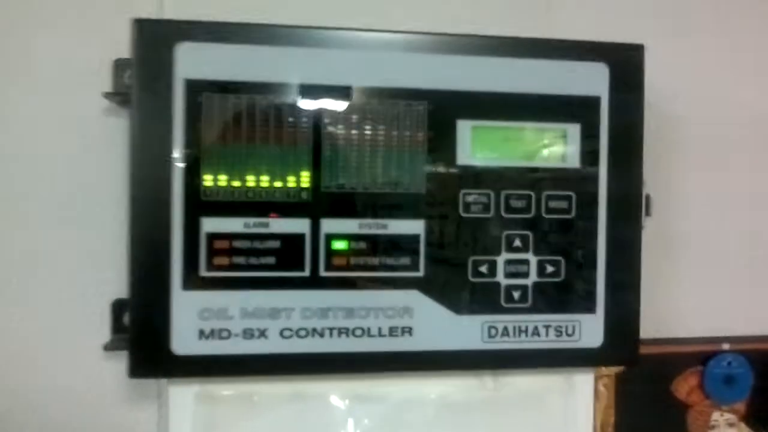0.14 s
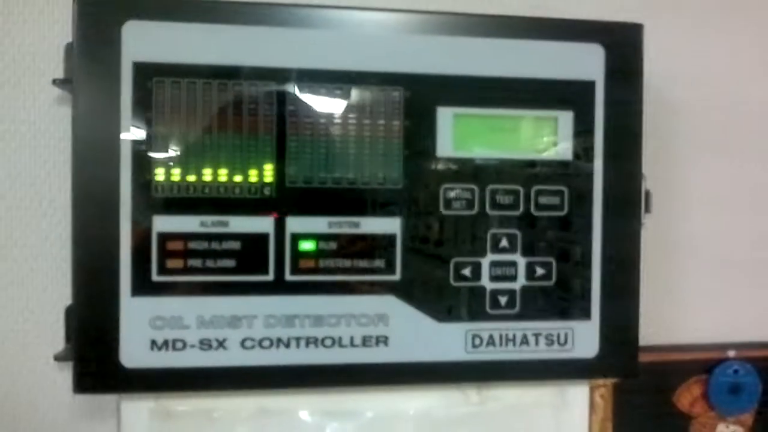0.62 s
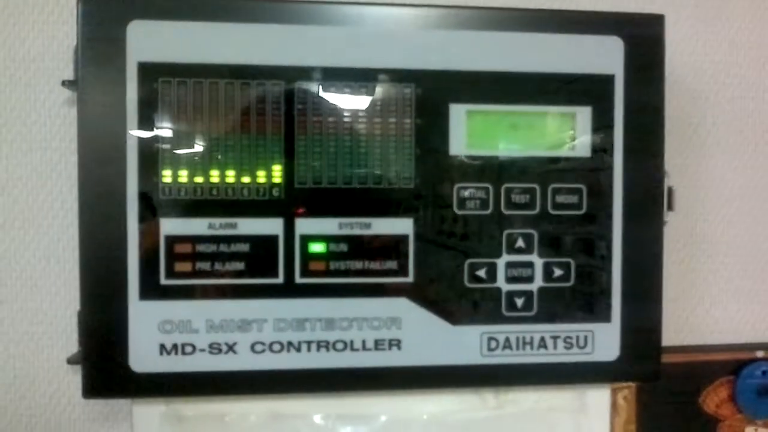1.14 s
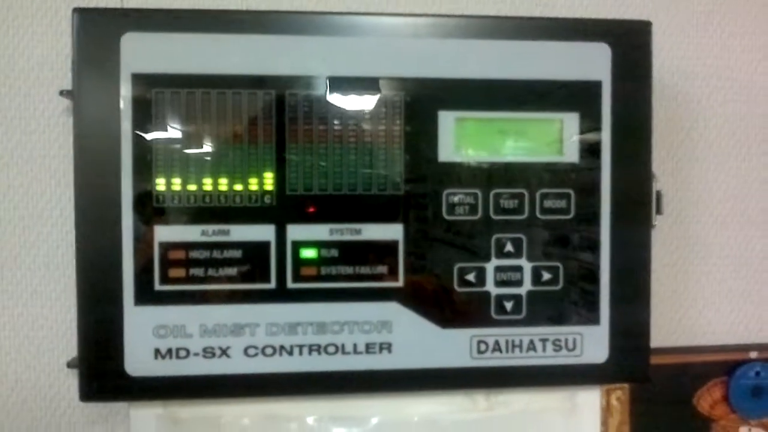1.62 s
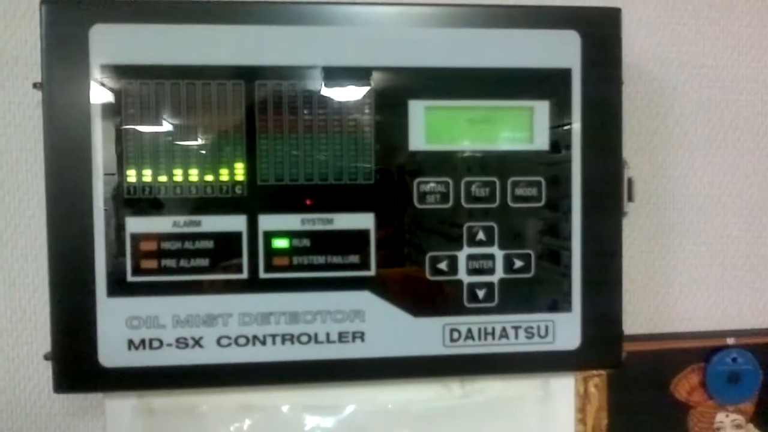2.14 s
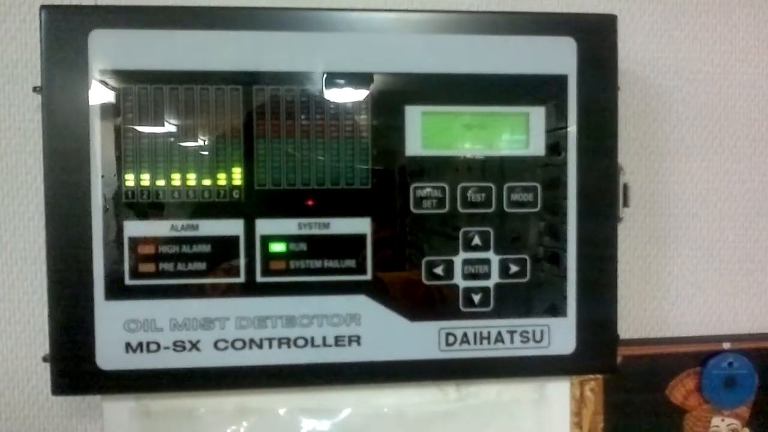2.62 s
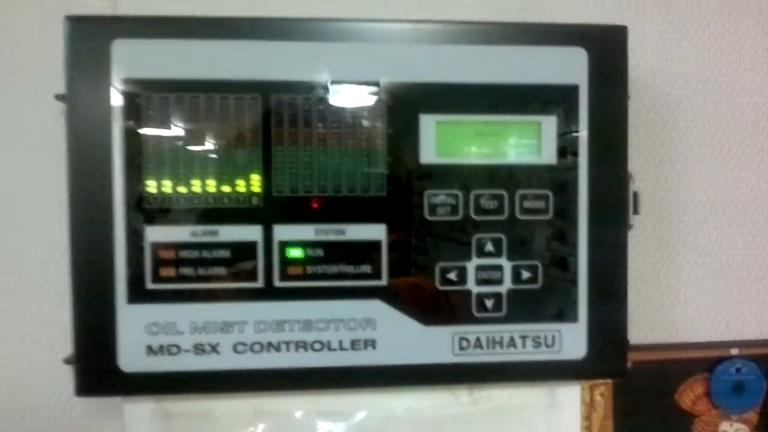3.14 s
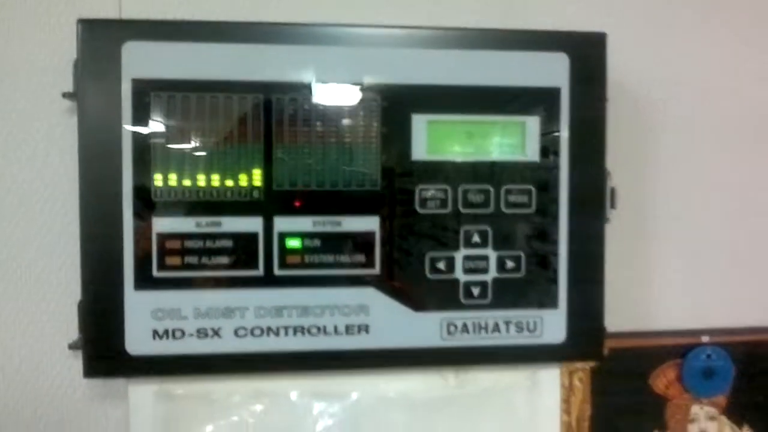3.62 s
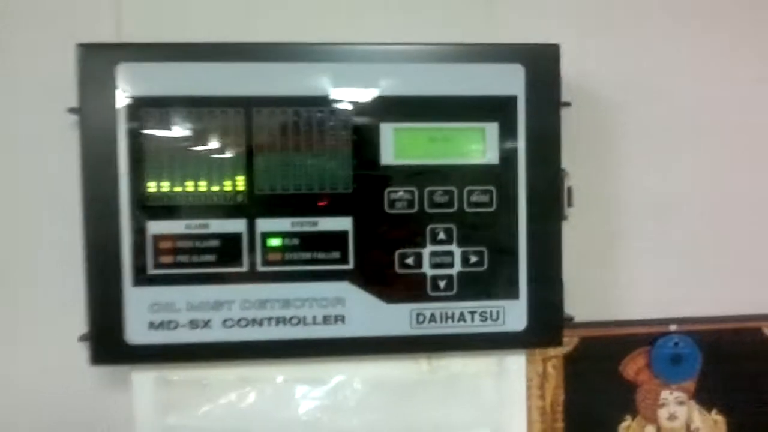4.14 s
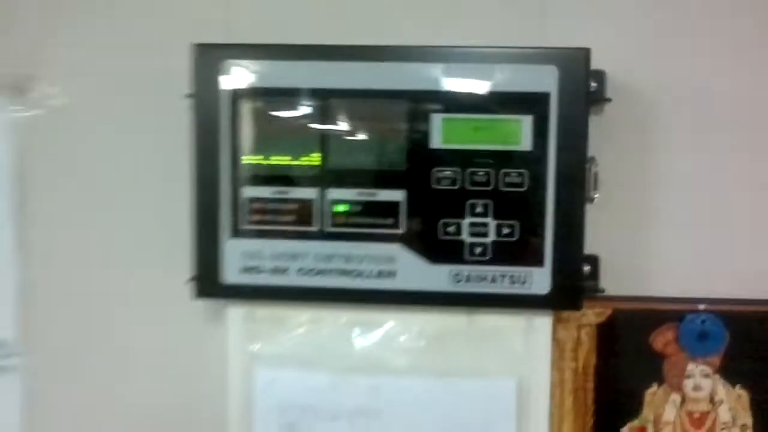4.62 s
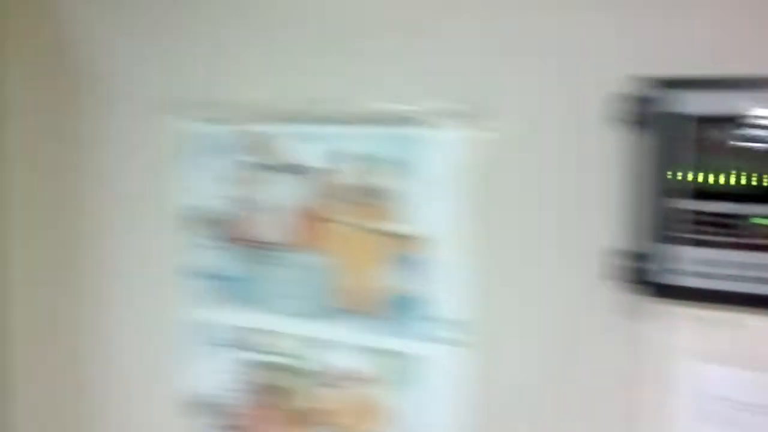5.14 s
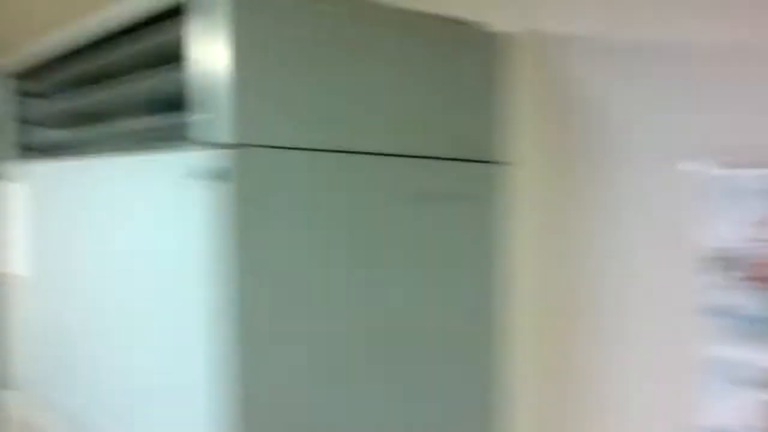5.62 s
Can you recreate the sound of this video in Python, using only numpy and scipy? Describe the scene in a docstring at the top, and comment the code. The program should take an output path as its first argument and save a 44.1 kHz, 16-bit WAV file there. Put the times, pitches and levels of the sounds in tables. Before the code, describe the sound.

Continuous low engine drone and rushing air fill an indoor control room, a wavering high-pitched whine on top and one tiny tick early on.

```python
"""A control room beside a running ship's engine. From the start the hull rumbles in the room's low modes,
ventilation air hisses as shaped noise, two turbochargers whine at nearly the same speed as stacked blade
tones, and a motor, panels and ducts hum faintly. At about 1.7 s something small ticks once, as ringing modes.
Later the slower whine sinks a little and partly recovers, and the microphone turns more towards the air."""
import sys
import numpy as np
from scipy import signal
from scipy.fft import rfft, irfft
from scipy.io import wavfile
from scipy.ndimage import uniform_filter1d

SR = 44100
rng = np.random.default_rng(int(sys.argv[2]) if len(sys.argv) > 2 else 0)


def bounce(signal):
    """Save signal as a 16-bit WAV file at the path given by the first command-line argument."""
    frames = np.transpose(np.atleast_2d(signal))
    limited = np.clip(frames, -1, 1)
    pcm = np.round(limited * 32767).astype(np.int16)
    wavfile.write(sys.argv[1], SR, pcm)


def to_linear_factor(level_db):
    """Convert decibel levels (scalar or array-like) to linear amplitude factors."""
    exponent = np.asarray(level_db, float) / 20
    return 10 ** exponent


N = 254016  # samples, 5.76 s
FLARE_EDGE_S = 0.018  # softness of the edges of whine flares and hum whiffs


def rms_one(x):
    """Scale to rms 1."""
    return x / np.sqrt(np.mean(x ** 2) + 1e-20)


def in_time(rows):
    """Turn rows of (seconds, value) into one value a sample."""
    seconds, values = np.transpose(rows)
    return np.interp(np.arange(N) / SR, seconds, values)


def drift(rate_hz):
    """Slow chance wandering with spread 1: coarse noise through two equal one-pole low-passes."""
    coarse = 40  # samples between the coarse values
    r = np.exp(-2 * np.pi * rate_hz * coarse / SR)
    noise = rng.standard_normal(N // coarse + 2002)
    slow = signal.lfilter([1], [1, -2 * r, r * r], noise)[2000:]
    return np.interp(np.arange(N) / coarse, np.arange(len(slow)), rms_one(slow))


def band_noise(low_hz, high_hz, order=2):
    """Noise in one band, its filter run in before the start; rms 1."""
    sos = signal.butter(order, [low_hz, high_hz], "band", fs=SR, output="sos")
    return rms_one(signal.sosfilt(sos, rng.standard_normal(N + SR))[SR:])


def resonant_noise(modes, order):
    """Noise through resonances; the narrow ones sound like unsteady tones."""
    total = np.zeros(N)
    for hz, width_hz, db in modes:
        total += to_linear_factor(db) * band_noise(hz - width_hz / 2, hz + width_hz / 2, order)
    return total


def swelling(rest_db, swells, edge_s):
    """Level in dB: soft-edged swells add their power to a steady rest."""
    t = np.arange(N) / SR
    power = to_linear_factor(rest_db) ** 2
    for start, length, db in swells:
        from_middle = np.abs(t - start - length / 2)
        beyond = np.maximum(from_middle - length / 2 + edge_s, 0) / edge_s
        power = power + to_linear_factor(db) ** 2 * np.exp(-beyond ** 2 / 2)
    return 10 * np.log10(power)


def coloured(points, flicker_db):
    """Noise with the given spectrum, each octave flickering partly on its own; rms 1."""
    hz = np.maximum(np.fft.rfftfreq(N, 1 / SR), 1)
    point_hz, point_db = np.transpose(points)
    shape_db = np.interp(np.log(hz), np.log(point_hz), point_db)
    spectrum = rfft(rng.standard_normal(N)) * to_linear_factor(shape_db)
    octave = np.round(np.log2(hz / point_hz[0])).clip(0, 5)
    together = drift(0.98)
    total = np.zeros(N)
    for k in range(6):
        flicker = 0.5 * together + drift(7)
        total += irfft(spectrum * (octave == k), N) * to_linear_factor(flicker_db * flicker)
    return rms_one(total)


def rumble():
    """Hull vibration feeds the room modes; throbs swell for a few cycles; lulls spare only the lowest noise."""
    # Low room modes. Each row: pitch in Hz, width in Hz, level in dB before the evening out.
    room_modes = [(29.9, 12, -31), (42.7, 8.1, -30.5), (57.8, 17.8, -27.5), (81.9, 16.2, -30.5),
                  (98.3, 9.5, -36), (114, 14, -36.5)]
    # Chance throbs. Each row: start in seconds, length in seconds, peak-swell level in dB, pitch in Hz.
    throbs = [(0.132, 0.1, -18, 42.0), (0.353, 0.13, -20, 56.0), (0.543, 0.038, -17, 50.0),
              (0.797, 0.037, -18.5, 40.0), (0.86, 0.058, -24, 52.0), (0.863, 0.046, -27, 82.0),
              (1.038, 0.11, -26, 116.0), (1.043, 0.035, -18.5, 34.0), (1.164, 0.046, -19, 54.0),
              (1.312, 0.042, -18, 38.0), (1.411, 0.066, -15.5, 44.0), (1.5, 0.071, -19, 50.0),
              (1.503, 0.068, -23, 84.0), (1.628, 0.05, -20.5, 52.0), (1.867, 0.025, -15.5, 54.0),
              (1.871, 0.022, -22.5, 100.0), (1.94, 0.063, -19, 40.0), (2.045, 0.053, -20, 50.0),
              (2.09, 0.041, -28, 70.0), (2.142, 0.058, -28.5, 92.0), (2.217, 0.017, -9, 56.0),
              (2.273, 0.024, -23, 104.0), (2.355, 0.036, -25, 116.0), (2.43, 0.065, -19.5, 56.0),
              (2.675, 0.045, -14, 42.0), (2.698, 0.057, -29, 76.0), (2.76, 0.038, -21.5, 96.0),
              (2.834, 0.03, -18, 44.0), (2.945, 0.048, -18, 46.0), (3.02, 0.11, -25.5, 114.0),
              (3.163, 0.059, -21.5, 40.0), (3.29, 0.065, -21, 38.0), (3.51, 0.031, -18, 50.0),
              (3.513, 0.13, -32, 110.0), (3.574, 0.053, -21.5, 86.0), (3.724, 0.046, -18.5, 60.0),
              (3.802, 0.043, -18.5, 42.0), (3.917, 0.037, -26, 42.0), (4.01, 0.057, -20, 84.0),
              (4.126, 0.078, -30, 42.0), (4.176, 0.051, -28.5, 84.0), (4.296, 0.095, -18, 60.0),
              (4.546, 0.06, -23, 42.0), (4.685, 0.18, -20.5, 42.0), (4.766, 0.039, -15.5, 52.0),
              (4.81, 0.063, -31, 116.0), (4.86, 0.051, -18.5, 54.0), (5.166, 0.055, -14.5, 44.0),
              (5.35, 0.19, -21, 40.0), (5.36, 0.072, -20.5, 60.0), (5.53, 0.12, -27, 50.0)]
    # Brief drops. Each row: start in seconds, length in seconds, rough depth in dB.
    lulls = [(0.772, 0.031, 9), (1.098, 0.02, 5), (1.2, 0.034, 7), (1.557, 0.033, 3), (1.83, 0.031, 4),
             (2.481, 0.065, 7), (2.983, 0.022, 7), (3.125, .03, 2), (3.345, 0.02, 10), (3.432, 0.042, 9),
             (4.06, 0.045, 8), (4.935, 0.048, 14), (5.302, 0.045, 8), (5.444, 0.022, 12), (5.592, 0.06, 10)]
    evening = 0.46  # share of the modes' own beating that is evened out
    throb_spread = 0.44  # width of the bell-shaped swell, as a share of the throb's length

    t = np.arange(N) / SR
    modes = resonant_noise(room_modes, order=2)
    beat = np.sqrt(uniform_filter1d(rms_one(modes) ** 2, int(0.06 * SR)) + 0.029)
    body = modes / beat ** evening
    for start, length, db, hz in throbs:
        swell = np.exp(-0.5 * ((t - start - length / 2) / (throb_spread * length)) ** 2)
        body += to_linear_factor(db) * np.sqrt(2) * swell * np.sin(2 * np.pi * (hz * t + rng.random()))
    lull_gain = to_linear_factor(-swelling(0, lulls, edge_s=0.0029))
    subsonic = to_linear_factor(-31.5) * band_noise(10.5, 36.0)
    return body * lull_gain + subsonic


def ventilation():
    """Four layers of air noise follow the turn of the microphone, each by its own share."""
    # Spectra of duct drone, duct roar, grille hiss and finest hiss.
    # Each row: frequency in Hz, relative level per Hz in dB.
    drone_colour = [(75, -37), (128, -0.5), (140, 0), (172, -6.5), (212, -7.5), (229, -11), (250, -9),
                    (285, -12), (366, -11.5), (430, -17.5), (560, -53), (950, -120)]
    roar_colour = [(280, -33), (470, 3), (840, -1.5), (1110, -1), (1210, -3.5), (1830, -6), (2100, -5.5),
                   (2290, -8), (2530, -7), (3350, -7), (4080, -13), (4400, -13), (5720, -51), (9680, -120)]
    hiss_colour = [(2710, -52), (4600, -6), (5800, 0.5), (6860, -0.5), (8450, -4.5), (8700, -10.5),
                   (11300, -14.5), (19100, -120)]
    finest_colour = [(5350, -13.5), (9100, -0.5), (9290, -1), (12300, -11), (13800, -9.5), (15700, -17)]
    # The same four layers. Each row: level in dB, share of the turn's gain, flicker in dB.
    air_layers = [(-32.5, 0.17, 1.52), (-38, 1.24, 1.3), (-43, 1.15, 1.14), (-48, 0.6, 1.2)]
    # The microphone turns towards the ventilation. Each row: time in seconds, gain in dB before the share.
    facing = [(0, 0), (.5, -.5), (1.2, .5), (2.2, 0), (2.8, 0.5), (3.5, 0), (4.3, 1), (4.75, 1.5),
              (4.95, .5), (5.2, 3), (5.45, 1), (5.76, 3.5)]
    # The finest hiss brightens. Each row: start in seconds, length in seconds, added level in dB.
    brightenings = [(3.1, .1, -53), (4.45, .3, -51), (4.622, 0.17, -45.5), (5.66, .2, -48)]

    facing_db = in_time(facing)
    colours = [drone_colour, roar_colour, hiss_colour, finest_colour]
    total = np.zeros(N)
    for colour, (layer_db, share, flicker_db) in zip(colours, air_layers):
        if colour is finest_colour:
            layer_db = swelling(layer_db, brightenings, edge_s=0.041)
        total += to_linear_factor(layer_db + share * facing_db) * coloured(colour, flicker_db)
    return total


def turbo(blade_hz, rest_db, flares, orders, flaring_order, waver_hz, flutter_db):
    """Blade tones on one shaft; echoes in the steel rooms blur each order, make it flutter and one flare."""
    flare_spill = 0.18  # share of a flare's dB that the other orders follow
    phase = 2 * np.pi * np.cumsum(blade_hz + waver_hz * drift(1.44)) / SR
    flare_db = swelling(rest_db, flares, FLARE_EDGE_S) - rest_db
    total = np.zeros(N)
    for k, order_db in orders:
        # phase scatter in radians, more for short waves
        blur = (0.85 + 0.03 * k ** 2) * drift(12)
        share = 1 if k == flaring_order else flare_spill
        level_db = rest_db + order_db + share * flare_db + flutter_db * drift(31.0)
        total += to_linear_factor(level_db) * np.sqrt(2) * np.sin(k * phase + blur)
    return total


def slow_turbo():
    """The slower shaft loses a little speed, then regains some; its fourth order flares."""
    # Each row: time in seconds, blade tone in Hz before the waver.
    speed = [(0, 2214.7), (3.0, 2214), (4.3, 2211.5), (5.2, 2208.5), (5.76, 2211.5)]
    # Each row: order, level in dB over the whine's resting level.
    orders = [(1, 6.5), (2, -3), (3, -3), (4, -2), (5, -13), (6, -21), (7, -25)]
    # Each row: start in seconds, length in seconds, added level in dB before the order's own level.
    flares = [(.1, .08, -54), (.72, 0.21, -52), (1.763, 0.11, -49), (1.95, 0.15, -54.5), (2.13, 0.12, -47),
              (2.33, 0.076, -56), (2.55, 0.14, -54), (2.88, 0.28, -52), (3.33, .2, -51), (3.58, .1, -55),
              (3.72, .15, -52), (4.094, 0.099, -46), (4.27, .12, -54), (4.42, 0.19, -49),
              (4.72, 0.077, -50), (4.95, .1, -54), (5.15, 0.14, -55), (5.504, 0.17, -58)]
    return turbo(in_time(speed), -60, flares, orders, flaring_order=4, waver_hz=0.23, flutter_db=2.5)


def fast_turbo():
    """The faster shaft nearly holds its speed; its first order, the blade tone itself, flares."""
    # Each row: time in seconds, blade tone in Hz before the waver.
    speed = [(0, 2222), (3, 2221), (4.2, 2219), (5, 2221), (5.76, 2220)]
    # Each row: order, level in dB over the whine's resting level.
    orders = [(1, -10.5), (2, -18), (3, -20), (4, -15), (6, -28), (7, -35)]
    # Each row: start in seconds, length in seconds, added level in dB before the order's own level.
    flares = [(.12, .08, -54), (0.423, .08, -41), (1.004, 0.084, -33.5), (1.3, .12, -54),
              (1.544, 0.14, -37), (1.77, 0.049, -39), (1.99, .11, -38), (2.164, .09, -41), (2.28, .05, -41),
              (2.36, .15, -41), (2.587, 0.082, -41), (2.86, 0.06, -42), (2.95, 0.065, -41),
              (3.076, 0.12, -37), (3.812, .06, -48), (3.93, 0.067, -35), (4.21, 0.094, -33.5),
              (4.408, 0.05, -40), (4.51, 0.25, -38), (4.833, 0.04, -34), (4.93, 0.23, -37),
              (5.21, 0.054, -35.5), (5.332, 0.089, -32.5), (5.553, 0.057, -35)]
    return turbo(in_time(speed), -44, flares, orders, flaring_order=1, waver_hz=0.424, flutter_db=3.0)


def hums():
    """A motor's orders are thin wavering tones; noise bands hum beside them, some only in whiffs."""
    # Each row: order of the motor's turning, level in dB before its wavering.
    motor_orders = [(10, -58.5), (11, -53), (12, -58), (13, -52.5), (15, -54.5), (16, -62), (17, -59.5),
                    (20, -74)]
    # Narrow and broad hums of panels and ducts, and the whine's broad skirt near 2235 Hz.
    # Each row: pitch in Hz, width in Hz, level in dB.
    hum_bands = [(218, 7, -47), (318, 10, -47.5), (348, 16, -52), (380, 7, -50), (438, 10, -56),
                 (625, 14, -57), (817, 8, -52), (838, 8, -58), (895, 8, -59), (1095, 8, -56),
                 (1110, 12, -56), (1157, 8, -60), (1268, 8, -60), (1295, 8, -56), (2005, 40, -57),
                 (2198, 10, -61), (2235, 90, -54), (2310, 30, -60), (2372, 30, -58), (2412, 10, -62),
                 (3385, 170, -54), (4480, 6, -66), (4805, 14, -68), (6960, 40, -64), (7765, 90, -60)]
    # A rough band above the whine and the hum an octave below it come and go.
    # Each row: start in seconds, length in seconds, level in dB, pitch in Hz.
    whiffs = [(.7, .2, -54, 2412), (1.02, .15, -50, 2400), (1.01, .16, -52, 2300), (2.28, .06, -51, 2390),
              (1.03, .05, -52, 1105), (1.66, .06, -51, 2330), (1.82, .09, -47, 1103), (2.78, .2, -48, 1103),
              (3.04, .06, -50, 1105), (3.26, .12, -47, 1105), (3.55, .08, -51, 2365), (4.3, .06, -51, 1110),
              (4.79, .07, -48, 2372), (5.13, .08, -50, 2405), (5.38, .12, -48, 2385),
              (5.62, .08, -51, 1100)]
    motor_hz, whiff_width_hz = 57.9, 32

    turns = np.cumsum(motor_hz + 0.05 * drift(1.0)) / SR
    total = resonant_noise(hum_bands, order=1)
    for k, db in motor_orders:
        level = to_linear_factor(db + 3.5 * drift(2.3))
        total += level * np.sqrt(2) * np.sin(2 * np.pi * k * turns + 0.9 * drift(5.0))
    for start, length, db, hz in whiffs:
        gain = to_linear_factor(swelling(-99, [(start, length, 0)], FLARE_EDGE_S))
        total += gain * resonant_noise([(hz, whiff_width_hz, db)], order=1)
    return total


def tick():
    """A tiny hard contact rings a few short modes."""
    # Each row: time in seconds, strength of the contact in dB.
    ticks = [(1.6987, -23)]
    # Each row: pitch in Hz, relative level in dB, seconds to die away by 60 dB.
    tick_modes = [(10000, -1.5, 0.0055), (11300, -7, .004), (12400, -16, .003), (13400, -24, .002)]

    clicks = np.full(N, 1e-18)  # not quite zero, out of hearing
    for start, db in ticks:
        clicks[round(start * SR)] = to_linear_factor(db)
    ringing = np.zeros(N)
    for hz, db, t60 in tick_modes:
        r = to_linear_factor(-60 / (t60 * SR))
        w = 2 * np.pi * hz / SR
        ringing += to_linear_factor(db) * signal.lfilter([0, np.sin(w)], [1, -2 * r * np.cos(w), r * r], clicks)
    # the contact lasts a moment, which dulls the highest part
    dulling = signal.butter(4, [8000, 13500], "band", fs=SR, output="sos")
    return signal.sosfilt(dulling, ringing)


def scene():
    """Rumble, air, whines, hums and the tick reach one microphone."""
    mix = rumble() + ventilation() + slow_turbo() + fast_turbo() + hums() + tick()
    return mix[None]


def low_pass(x):
    """Removes everything above the highest recorded frequency."""
    return signal.sosfilt(signal.butter(12, 16000, fs=SR, output="sos"), x)


def record(dry):
    """A steep low-pass cuts the top of the finished mix."""
    top_cut = signal.ellip(12, 0.3, 60, 15720, fs=SR, output="sos")  # ripple dB, depth dB, edge Hz
    finished = signal.sosfilt(top_cut, dry)
    return low_pass(finished)


dry = scene()
out = record(dry)
bounce(out)
```